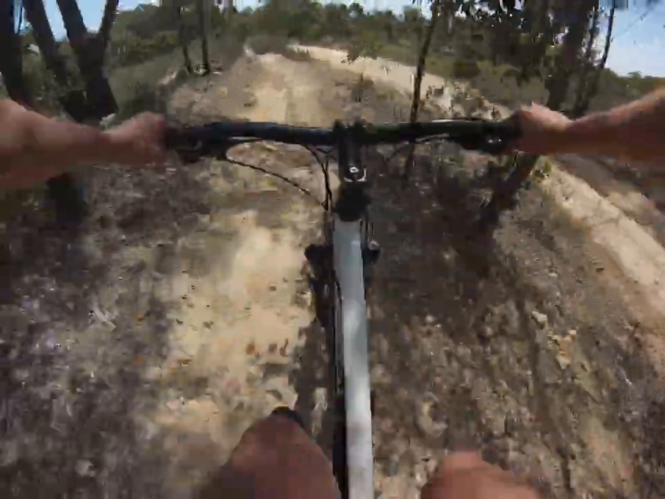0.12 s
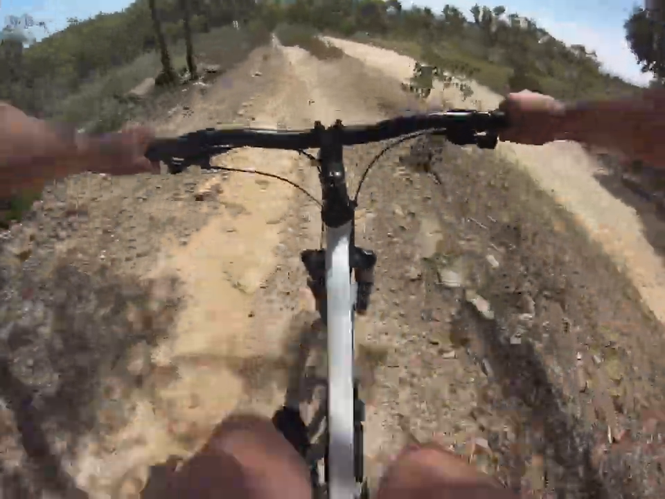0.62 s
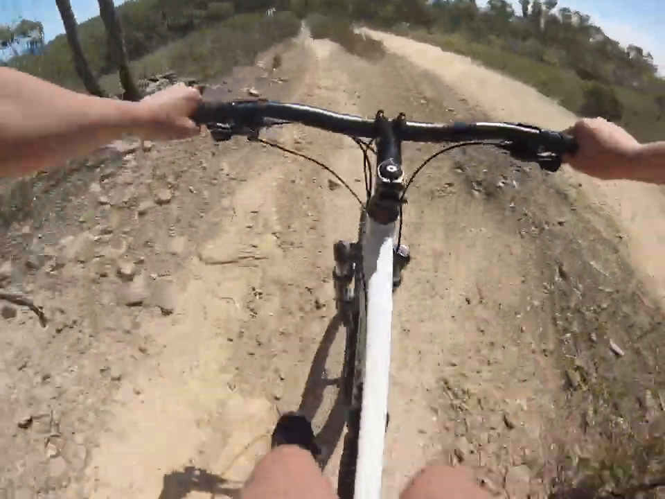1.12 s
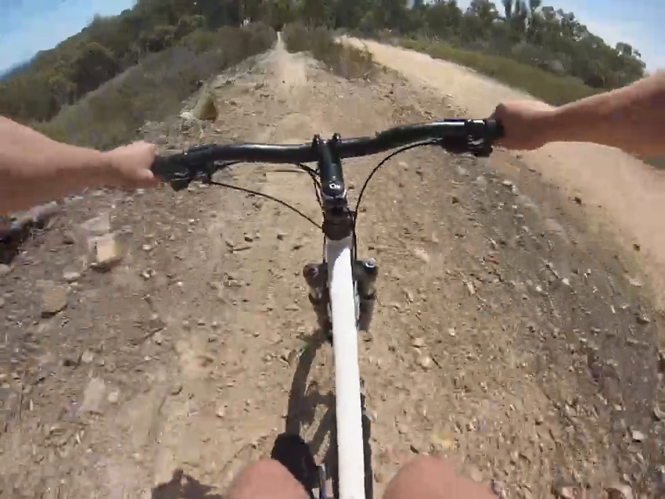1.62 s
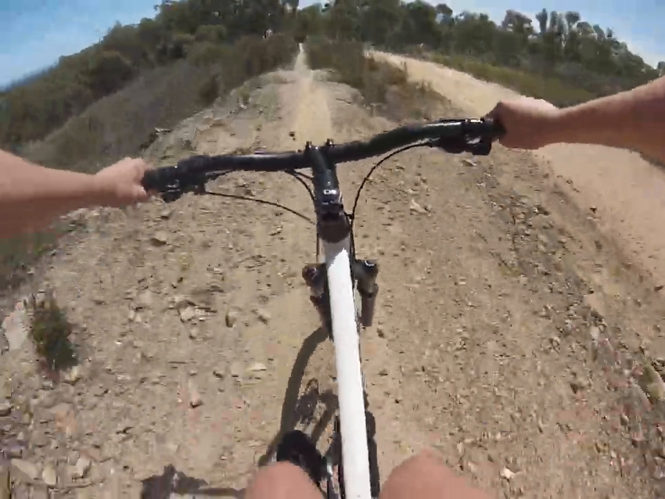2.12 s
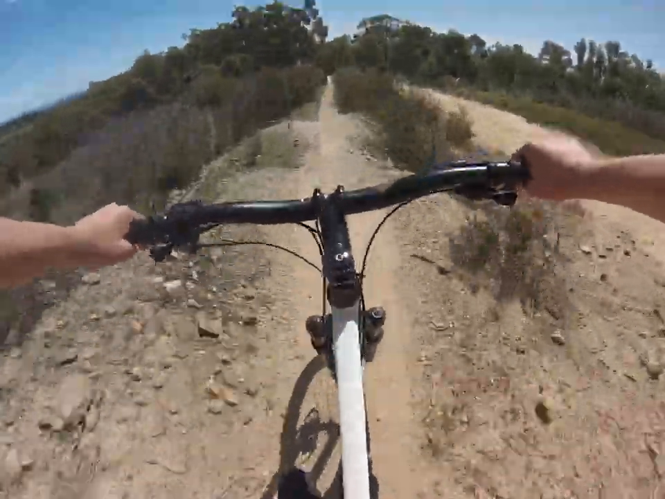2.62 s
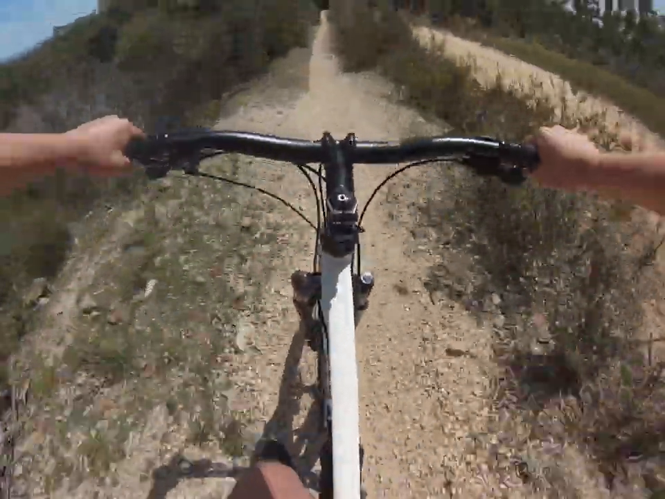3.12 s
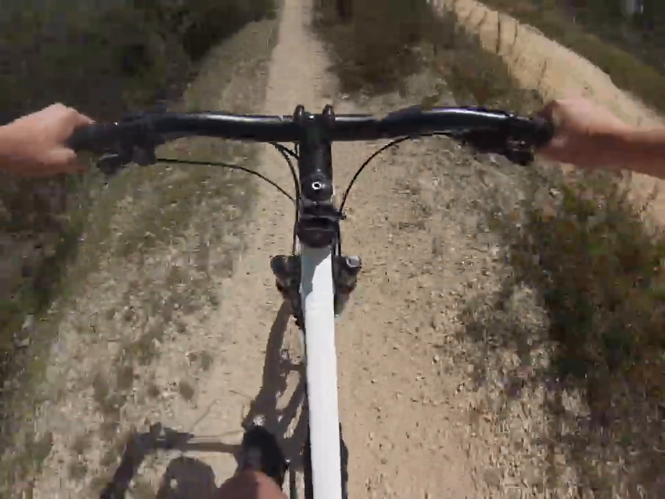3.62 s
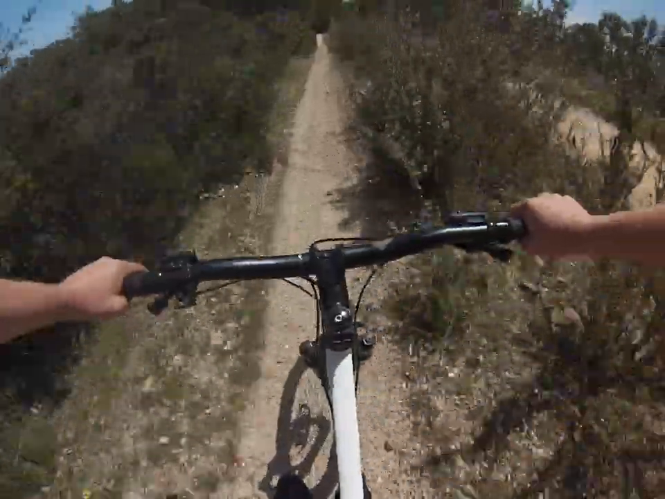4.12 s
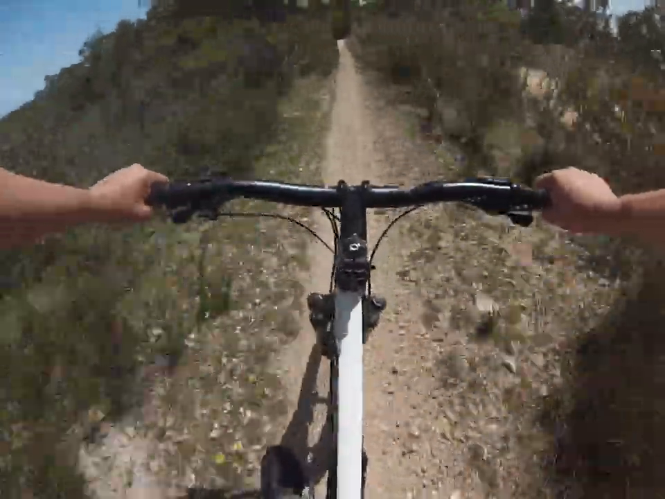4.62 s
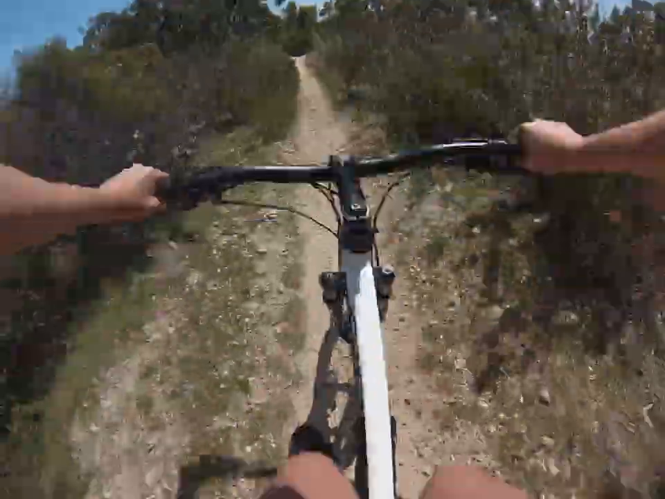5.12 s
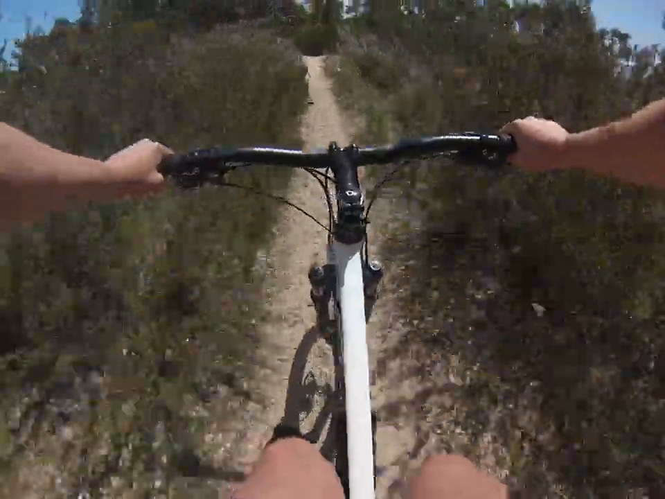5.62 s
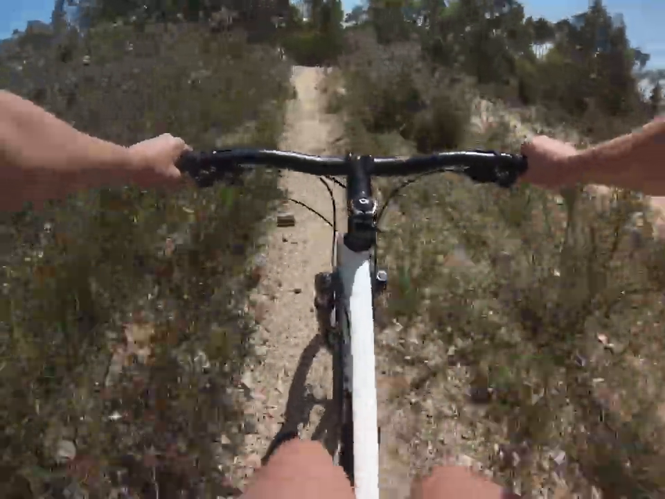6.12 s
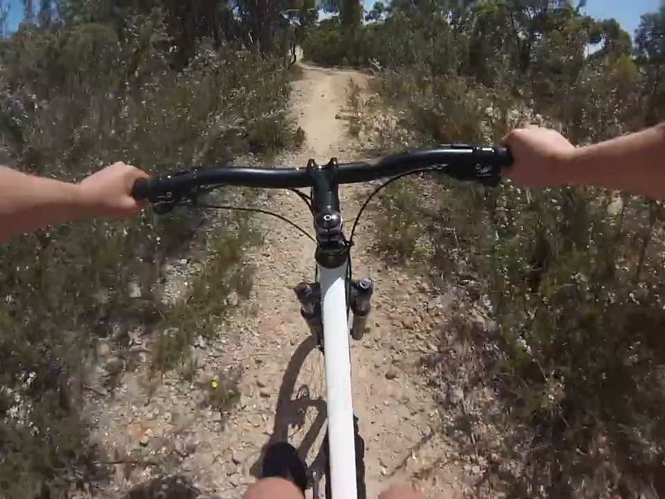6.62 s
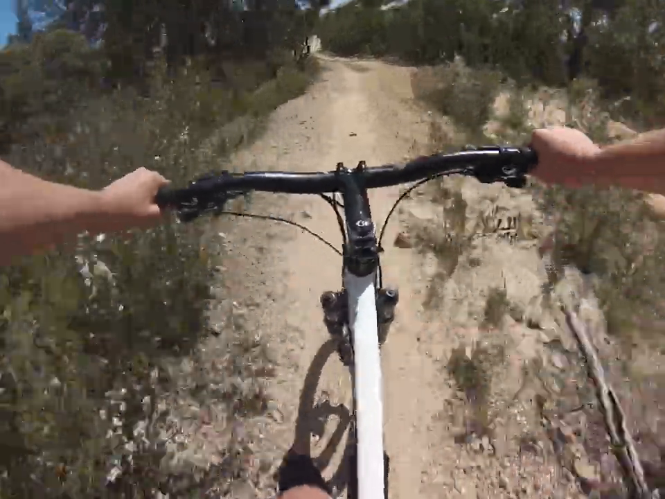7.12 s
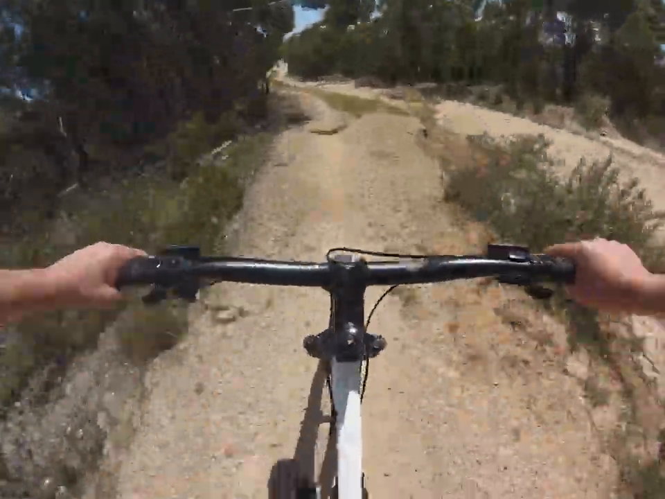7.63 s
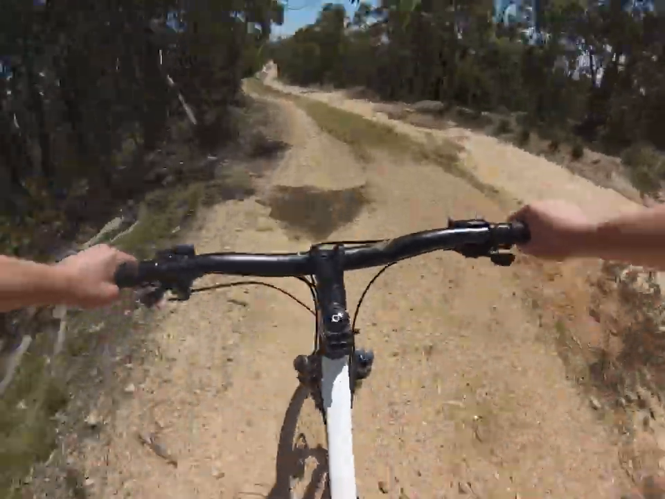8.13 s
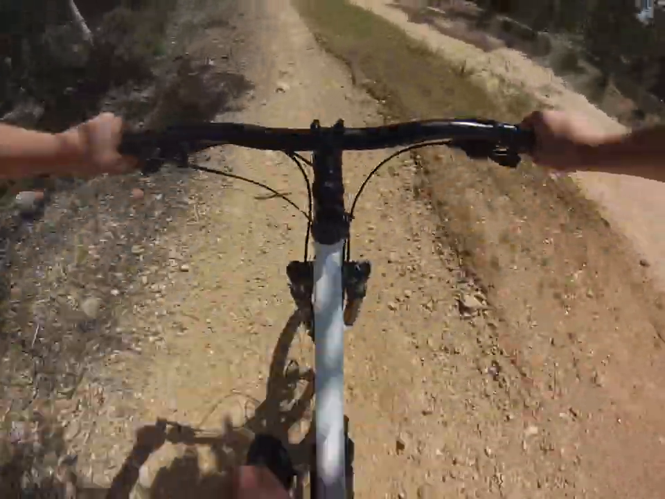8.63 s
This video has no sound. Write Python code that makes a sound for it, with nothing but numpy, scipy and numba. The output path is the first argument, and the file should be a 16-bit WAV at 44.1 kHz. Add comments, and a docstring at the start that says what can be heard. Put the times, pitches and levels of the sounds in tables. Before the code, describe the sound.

A mountain bike rolls down a stony dirt trail, boxy hum and wind rumble under gritty tyre crunch, hard hollow knocks and sharp rattles.

```python
"""A stony dirt trail: a mountain bike rolls down it, heard inside a small sealed camera on the rider's chest.
Wind is gusting bands of noise, and with the rough ground it makes the case boom through narrow resonances.
Tyres crunch grit, made of random ticks coloured by the air cavities of the case.
Jolts ring two case modes, the hardest overloading the microphone.
Stones tick and chain or cables rattle: short bursts of clicks through a set of resonances."""
import sys
import numpy as np
from scipy import signal
from scipy.io import wavfile
from scipy.ndimage import uniform_filter1d
from numba import njit

SR = 44100
rng = np.random.default_rng(int(sys.argv[2]) if len(sys.argv) > 2 else 0)


def invert_db(level):
    """Linear amplitude ratio for a level in decibels (20 dB per decade), elementwise."""
    return 10 ** (np.asarray(level, dtype=float) / 20)


def wav_record(signal):
    """Record a signal, one row per channel, as 16-bit PCM in the file named by sys.argv[1]."""
    frames = np.transpose(np.atleast_2d(signal))
    bounded = np.clip(frames, -1, 1)
    # unit amplitude maps onto the largest positive 16-bit level
    quanta = np.round(bounded * 32767).astype(np.int16)
    wavfile.write(sys.argv[1], SR, quanta)


N = 385875
TIME = np.arange(N) / SR  # seconds
USUAL_CRUNCH_DB = -58  # tyre level that counts as usual ground

# Resonances that colour stone ticks (low rows) and chain or cable rattles (high rows).
# Each row: centre [Hz], width [Hz], relative level [dB].
CLATTER_MODES = [(1500, 200, -3.5), (1950, 310, -4), (2800, 500, -5), (3500, 140, -8), (4080, 340, -8),
                 (6050, 640, -5), (6420, 250, -6.5), (7850, 330, -9), (9800, 470, -12), (11800, 760, -13)]


def unit(x):
    """Scale to rms 1."""
    return x / np.sqrt(np.mean(x ** 2))


def band(x, hz, width):
    """Two-pole resonance, gain 1 at the centre."""
    return signal.lfilter(*signal.iirpeak(hz, hz / width, fs=SR), x)


def steep(x, hz, width):
    """A resonance applied twice, the second time twice as wide, with dark valleys beside it."""
    return band(band(x, hz, width), hz, 2 * width)


def body(x, modes):
    """Sum of resonances with alternating signs."""
    return sum((-1) ** k * invert_db(db) * band(x, hz, width) for k, (hz, width, db) in enumerate(modes))


def walk(rate):
    """Random levels held 1 / rate seconds and slewed twice, scaled to rms 1."""
    hold = int(SR / rate)
    levels = np.repeat(rng.standard_normal(N // hold + 1), hold)
    return unit(uniform_filter1d(uniform_filter1d(levels, hold), hold)[:N])


def grit(spread_db):
    """Dense tiny impacts, some larger than the rest."""
    size_db = spread_db * np.minimum(rng.exponential(size=N), 5)
    return unit(rng.standard_normal(N) * invert_db(size_db))


def curve(table):
    """Columns of a table joined by straight lines in time."""
    s, *columns = np.transpose(table)
    return [np.interp(TIME, s, column) for column in columns]


def wind(level_db):
    """Eddies on the case: bands of noise that gust together and flutter alone."""
    # Spectrum of the rumble. Each row: band centre [Hz], relative level [dB].
    wind_bands = [(22, 3.5), (32, -8.5), (45, 3.5), (63, 3.5), (90, 4), (125, 3.5), (180, 3), (250, 4)]
    gust = walk(6)
    rumble = 0
    for hz, db in wind_bands:
        flutter_db = 2.9 * gust + 0.94 * walk(9)
        eddies = band(band(rng.standard_normal(N), hz, 0.43 * hz), hz, 0.41 * hz)
        rumble = rumble + invert_db(db + flutter_db) * unit(eddies)
    return invert_db(level_db) * unit(rumble)


def boom(level_db):
    """Buffeting and trail chatter, as unsteady noise, keep the case humming on its mount."""
    # Hum of the case. Each row: centre [Hz], width of the first filter pass [Hz], relative level [dB].
    hum_modes = [(339.6, 77.5, 12.5), (392, 78, -11.5), (559, 300, -41.5), (667, 130, -18.5)]
    shake = invert_db(2.06 * walk(25)) * rng.standard_normal(N)
    hum = sum(invert_db(db) * unit(steep(shake, hz, width)) for hz, width, db in hum_modes)
    return invert_db(level_db) * unit(hum)


def tyres(low_db, top_db):
    """Grit crackles under the tread; the case cavities colour it, each hearing its own mix of stones."""
    # Air cavities of the case, lower and upper.
    # Each row: centre [Hz], width of the first filter pass [Hz], gain before its own flicker [dB].
    low_cavities = [(844, 106, 7.5), (1297, 290, -1.5), (1437, 220, -1.5), (1823, 360, 3),
                    (2520, 600, -12.5), (3600, 630, -10)]
    top_cavities = [(5680, 860, 1), (7660, 1500, 0.5), (11200, 4500, -7)]
    # thick gravel merges into a steady wash, sparse stones crunch in patches
    depth_db = np.clip(1.3 - .12 * (low_db + 52), 1, 4)
    ticks = invert_db(depth_db * walk(70) + 3 * walk(300))

    def colour(cavities):
        """Ticks of fresh grit through every cavity, each flickering in level."""
        return sum(invert_db(db + 2.36 * walk(150)) * steep(ticks * grit(4.55), hz, width)
                   for hz, width, db in cavities)

    return invert_db(low_db) * unit(colour(low_cavities)) + invert_db(top_db) * unit(colour(top_cavities))


def taps(count=80):
    """Light random nudges of the case, as rows like those of the knocks."""
    even, odd = rng.random((count, 2)).T, rng.standard_normal((count, 2)).T
    start = even[0] * (N - 300) / SR
    return np.transpose([start, -30 + 4 * odd[0], -36 + 4 * odd[1], 1.32 + even[1], -66 + 3 * odd[1]])


def knocks(events):
    """Rounded pushes ring two case modes that swing against each other; contact adds a crack."""
    # The case rocking in its mount. Each row: frequency [Hz], time to fall 60 dB [s].
    case_modes = [(420, 0.021), (720, 0.011)]
    # Colour of the crack. Each row: centre [Hz], width [Hz], relative level [dB].
    crack_modes = [(1287, 405, 15), (1990, 170, -12.5), (2795, 275, 6.5), (4270, 960, -5),
                   (5700, 330, -14.5), (8100, 2700, -17), (11500, 2800, -19)]
    push, crack = np.zeros((2, N)), np.zeros(N)
    chatter = rng.standard_normal((len(events), 256))
    for (s, low_db, high_db, contact_ms, crack_db), noise in zip(events, chatter):
        i = int(s * SR)
        phase = np.clip((TIME[i:i + 128] - s) * 1000 / max(contact_ms, .1), 0, 1)
        force = np.sin(np.pi * phase) ** 1.5
        push[:, i:i + 128] += invert_db([[low_db], [high_db]]) * force / force.sum()
        crack[i] += invert_db(crack_db + 10.0 - 3.2 * contact_ms)  # long soft contact clicks less
        crack[i:i + 256] += invert_db(crack_db - 11.5) * noise * np.exp(-TIME[:256] / 0.0018)
    # each mode is one complex pole: its angle is the pitch, its radius the decay
    poles = [np.exp(2j * np.pi * hz / SR - np.log(1000) / (t60 * SR)) for hz, t60 in case_modes]
    low, high = (signal.lfilter([1], [1, -pole], x).real for pole, x in zip(poles, push))
    # the soft strap weakens slow pushes
    ring = signal.lfilter(*signal.butter(1, 200, "high", fs=SR), low - high)
    return ring + invert_db(10.0) * body(crack, crack_modes)


def clatter(events):
    """Stone ticks and chain or cable rattles: short bursts of clicks, each exciting the modes differently."""
    spot_db = 3 * rng.standard_normal((len(events), len(CLATTER_MODES)))
    t, hz = TIME[:SR // 16], np.array(CLATTER_MODES)[:, 0]
    rise = 1 - np.exp(-t / .002)
    strength = np.zeros((len(CLATTER_MODES), N))
    for (s, db, tilt_db, decay_ms, ring_hz), spot in zip(events, spot_db):
        near_db = 8 * np.exp(-(np.log(hz / ring_hz) / 0.16) ** 2)  # favours modes near ring_hz
        burst = rise * np.exp(-np.log(1000) * t * 1000 / (12 + 1.04 * decay_ms))
        mode_db = db + tilt_db * np.log2(hz / 3500) + near_db + spot  # tilt pivots at 3500 Hz
        here = strength[:, int(s * SR):][:, :len(t)]  # a view, cut short at the end of the scene
        here += np.outer(invert_db(mode_db), burst[:here.shape[1]])
    strength *= grit(4.7)
    # the width factor gives narrow and wide modes a like loudness
    return sum(invert_db(db - 6) * np.sqrt(SR / width) * (-1) ** k * band(strength[k], f, width)
               for k, (f, width, db) in enumerate(CLATTER_MODES))


def jingles(tyre_db, count=340):
    """Faint ticks all along the trail, livelier on rough ground, as rows like those of the clatter."""
    even, odd = rng.random((count, 3)).T, rng.standard_normal((count, 2)).T
    ring_hz = np.array(CLATTER_MODES)[(even[1] * len(CLATTER_MODES)).astype(int), 0]
    roughness_db = tyre_db[(even[0] * N).astype(int)] - USUAL_CRUNCH_DB
    level_db = -67.5 + 0.44 * roughness_db + 7.4 * odd[0]
    return np.transpose([even[0] * N / SR, level_db, -5 + 4 * odd[1], 18 * even[2], ring_hz])


def scene():
    """All sources meet at one microphone inside the case; wind and rough ground both feed the boom."""
    # Each row: time in seconds, wind rumble level in dB.
    gusts = [(0, -44.5), (.6, -31.5), (.9, -47), (1.5, -33), (1.9, -35.5), (2.24, -33.5), (2.5, -38),
             (3.0, -40.5), (3.27, -32.5), (3.42, -37), (3.65, -39.5), (3.95, -31.5), (4.34, -40),
             (4.7, -30), (5.3, -39.5), (6.0, -35.5), (6.25, -38.5), (6.6, -32.5), (7.2, -37.5), (7.5, -36),
             (7.75, -39.5), (8.25, -41), (8.58, -24.5), (8.75, -35.5)]
    # Loose stones under the tyres. Each row: time in seconds, crunch level in dB,
    # how far the treble of the crunch lies below it in dB.
    ground = [(0, -57, 11), (.17, -61.5, 10.5), (.61, -63, 9), (.8, -67.5, 12), (1.0, -62.5, 11),
              (1.4, -67.5, 9.5), (1.85, -65, 11), (2.46, -53.5, 15), (2.8, -65.5, 13.5), (3.2, -54.5, 10.5),
              (3.34, -57.5, 13), (3.44, -65, 18), (3.6, -61.5, 17), (3.72, -51, 14), (4.1, -55, 10),
              (4.6, -52.5, 17), (6.1, -53.5, 15), (6.7, -55.5, 18.5), (7.05, -53, 13), (7.3, -66.5, 9.5),
              (7.6, -61.5, 18), (7.75, -75, 12), (7.86, -68.5, 16), (7.9, -55.5, 14), (8.07, -52, 17),
              (8.21, -61, 17), (8.43, -70.5, 11), (8.68, -57, 15.5), (8.75, -51.5, 9)]
    # Jolts of the case. Each row: start in seconds, push on the low mode in dB, push on the high mode in dB,
    # contact time in ms, crack strength in dB before the offsets for click, noise and output.
    jolts = [(0.003, -4.5, -29, 2.7, -59), (0.0141, -16.5, -5, 1.13, -47), (0.1168, -2.5, -0.5, 1.72, -35),
             (0.2021, -2.5, -34, 1.67, -51), (0.2479, 3.5, 10, 2.49, -42), (0.3071, -12.5, -38, 0.92, -69),
             (0.3369, 6, 0.5, 1.08, -22.5), (0.3466, 10, 16, 2.1, -37), (0.3772, 4.5, 11, 2.7, -36),
             (0.4151, -15, -8.5, 1.07, -50), (0.4201, -3.5, 5, 2.53, -55), (0.765, 9, 4, 0.14, -38),
             (0.8402, -9, -7, 1.6, -46), (0.8709, -18, -5.5, 1.4, -56), (0.9805, -15.5, -21, 1.25, -55),
             (1.0457, 3.5, -1.5, 0.44, -22.5), (2.1543, -6.5, -4, 2.27, -66), (2.4480, -8, -36, 2.2, -61),
             (2.5710, -4, -42, 2.1, -48), (2.77, -13, -23, 1.3, -64), (2.7869, 3.5, 4.5, 1.12, -21.5),
             (2.826, -19, -24, 1.7, -60), (2.8574, -7, 4, 1.36, -37), (2.93, -26, -16, 1.7, -70),
             (2.957, -22, -28, 1.7, -43), (2.9675, 3, 13, 2, -34), (2.977, -12, 9.5, 1.87, -32),
             (2.9826, -5.5, -30, 1.84, -43), (3.1388, -2, -37, 2.92, -57), (3.2435, -14, -38, 2.15, -60),
             (3.4258, -14.5, -11, 1.5, -56), (3.4682, -20, -4.5, 1.5, -40.5), (3.479, -16.5, -17, 1.6, -59),
             (3.553, -31, 3.5, 1.42, -47), (3.5675, -1.5, 2, 1.42, -41.5), (3.6213, 8, 4.5, 0.8, -15.5),
             (3.6865, -1.5, -33, 2.73, -42), (5.1124, 0, 5, 1.82, -38), (5.1165, -4, 8, 2.32, -53),
             (5.159, -9.5, -35, 1.16, -56), (5.1659, -9, -40, 1.5, -54), (5.1838, -1, -6, 0.36, -43),
             (5.1889, -1, 6.5, 1.37, -43), (5.193, -1.5, -4, 0.93, -35.5), (5.2242, -6, -38, 2.25, -68),
             (5.292, -10, -38, 2.33, -66), (6.722, -39, -25.5, 0.39, -55), (7.0339, -13.5, -13, 1.58, -56),
             (7.1335, 1.5, -4.5, 0.4, -26.5), (7.201, -10, -30, 1.94, -57), (7.3233, 5, -1, 0.45, -22),
             (7.6552, -3.5, -7, 1.22, -42.5), (7.6595, -4, -12, 2.5, -61), (7.6663, -12, 1.5, 1.82, -40),
             (7.7615, -19, -12, 1.7, -59), (7.7654, -6, 3.5, 1.5, -37), (7.7684, -2, 1.5, 1.25, -39),
             (8.0428, 2, -44, 3.08, -63), (8.3754, -21, -10, 0.98, -47), (8.3841, -6, 1, 1.43, -44.5),
             (8.5118, -2, 6, 1.85, -46), (8.5142, 2.5, 9.5, 1.87, -39), (8.5218, -17, -3, 1.15, -36),
             (8.5353, -14, 6, 2.1, -53), (8.5442, 9.5, 14, 1.48, -23.5), (8.5605, -6.5, -17.5, 0.62, -48),
             (8.6988, 6.5, -38, 3.3, -48)]
    # Stone ticks (rows with a low favoured frequency) and chain or cable rattles (high ones).
    # Each row: start in seconds, level in dB before the mode gains, tilt in dB per octave,
    # decay setting in ms (stretched in clatter), favoured frequency in Hz.
    click_bursts = [(0.011, -46, 4.5, 23, 7850), (0.2, -40.5, 0.5, 7, 1500), (0.38, -48, -4, 16, 6420),
                    (0.418, -54, -17, 23, 1500), (0.442, -52, -2, 13, 3500), (0.554, -48, 0, 7.3, 11800),
                    (0.577, -50.5, -6, 26, 6050), (0.717, -53, -3, 48, 2800), (0.74, -50, -11.5, 7.4, 1500),
                    (0.842, -47.5, 3, 21, 2800), (0.91, -48, -6, 9, 3500), (0.985, -54.5, -15, 14, 2800),
                    (1.228, -56, -5, 8, 3500), (1.407, -56, -1, 8, 3500), (1.446, -45.5, 0, 18, 9800),
                    (1.516, -54.5, 0, 32, 11800), (1.702, -56, -4.5, 47, 3500), (1.89, -53, -2, 60, 1950),
                    (2.046, -57.5, -14.5, 23, 1500), (2.26, -59, 4, 50, 9800), (2.5, -56, 4, 31, 1950),
                    (2.72, -58, 0, 55, 2800), (3.383, -60.5, -8, 13, 2800), (3.525, -57, -9, 15, 2800),
                    (4.276, -53, -16.5, 17, 1950), (4.584, -53, -11.5, 12, 1950),
                    (4.764, -56.5, -15, 24, 1950), (4.954, -56, -10, 16, 1500), (5.092, -47, -9, 45, 6050),
                    (5.153, -47, -2.5, 42, 7850), (5.414, -53, -17.5, 8, 1500), (5.524, -54, -9, 8, 1500),
                    (6.03, -52, -13, 13, 1500), (6.336, -41, -0.5, 44, 11800), (6.588, -54, -9, 19, 1500),
                    (6.715, -48, -13.5, 23, 1500), (6.839, -46, -3, 23, 1950), (7.005, -40, 1, 33, 6050),
                    (7.096, -40.5, 2, 26, 6420), (7.288, -30.5, -1, 16.5, 6420),
                    (7.388, -58, 2.5, 25, 7850), (7.458, -54, -1, 20, 3500), (7.702, -58, -11, 13, 2800),
                    (7.888, -52.5, -2, 30, 1950), (7.939, -57, -10, 25, 1950), (8.004, -46.5, -2, 27, 3500),
                    (8.099, -50, 3, 34, 7850), (8.644, -49, -4, 25, 6050)]
    (wind_db,), (crunch_db, under_db) = curve(gusts), curve(ground)
    # -38.5 dB in a usual wind (-36 dB) on usual ground, then dB per dB of each
    boom_db = -38.5 + 0.18 * (wind_db + 36) + 0.23 * (crunch_db - USUAL_CRUNCH_DB)
    rolling = wind(wind_db) + boom(boom_db) + tyres(crunch_db, crunch_db - under_db)
    jolting = knocks(np.vstack([jolts, taps()]))
    clicking = clatter(np.vstack([click_bursts, jingles(crunch_db)]))
    return (rolling + jolting + clicking)[None]


@njit
def duck(x, top, depth, attack, release):
    """Gain control: turns down fast once the followed level passes top, then creeps back."""
    y, level = np.empty(len(x)), 0.
    for i in range(len(x)):
        y[i] = x[i] * (top / max(level, top)) ** depth
        # attack and release are the share of the gap closed per sample
        level += (abs(x[i]) - level) * (attack if abs(x[i]) > level else release)
    return y


def top_cut(x):
    """Nothing passes above the cut-off."""
    return signal.sosfilt(signal.butter(12, 16530, fs=SR, output="sos"), x)


def record(dry):
    """The sealed case dulls the top; gain control lags behind the hardest knocks, which are cut flat."""
    dull = signal.sosfilt(signal.butter(6, 13500, fs=SR, output="sos"), dry[0])
    levelled = duck(dull, 0.1, 0.62, 0.002, 0.00041)
    mix = np.clip(levelled, -1, 1)[None]
    return top_cut(mix)


dry = scene()
out = record(dry)
wav_record(out)
```